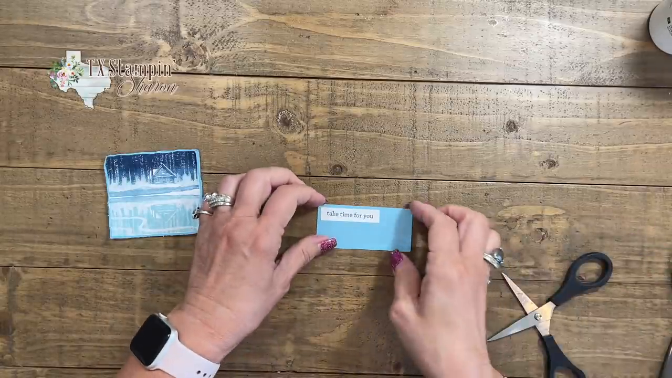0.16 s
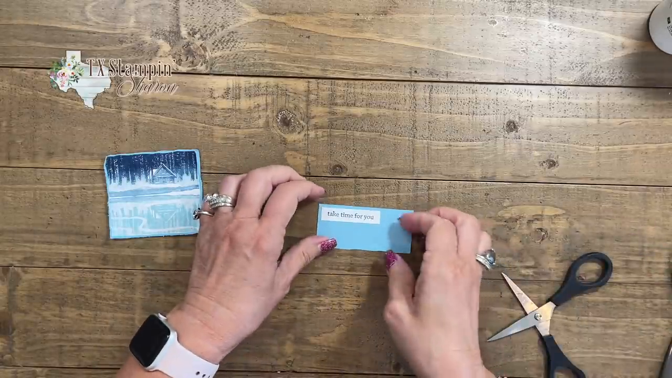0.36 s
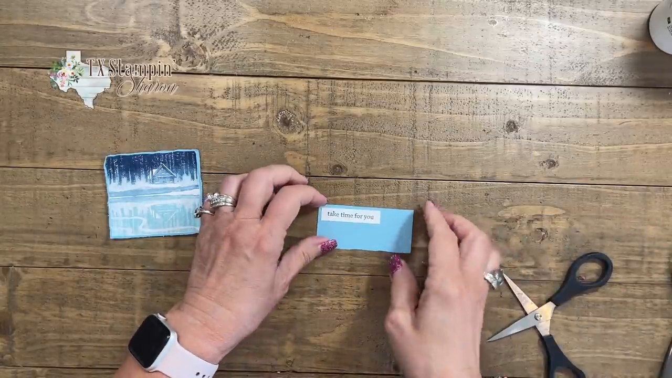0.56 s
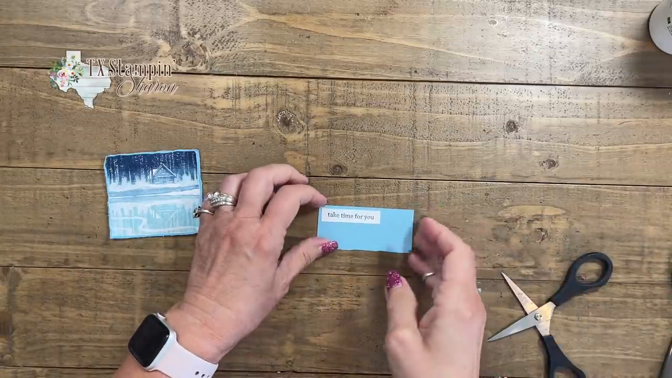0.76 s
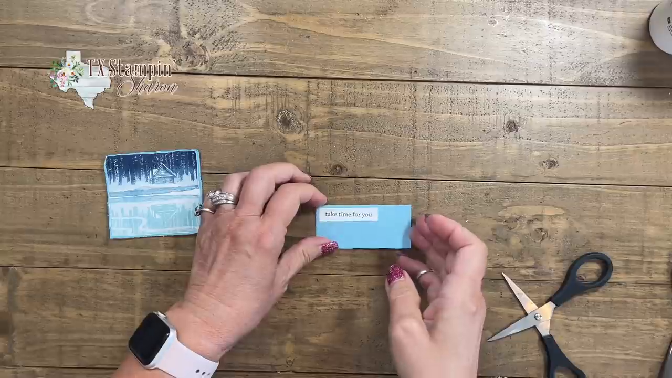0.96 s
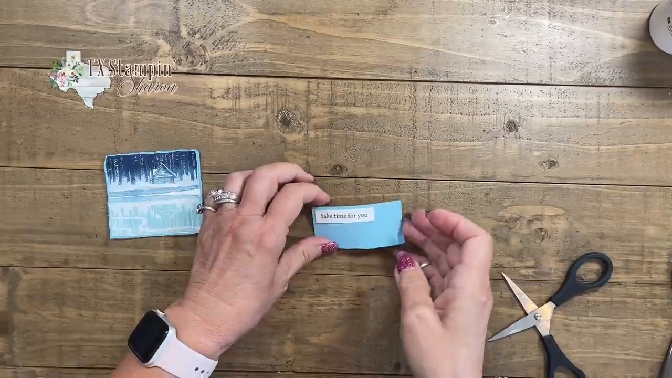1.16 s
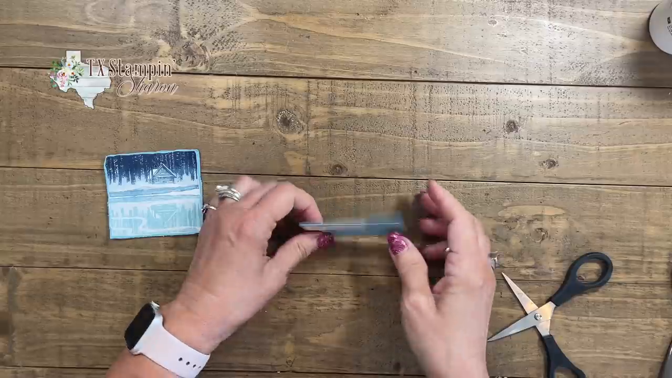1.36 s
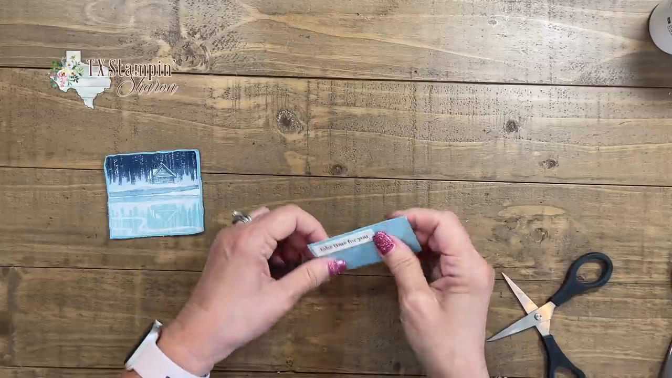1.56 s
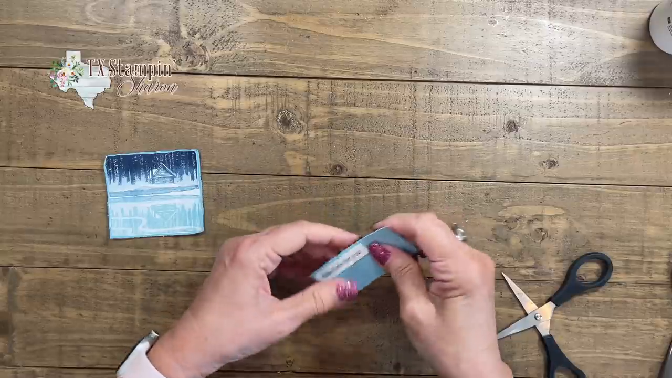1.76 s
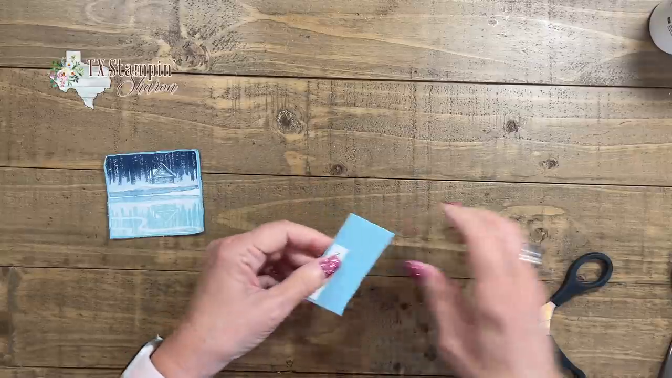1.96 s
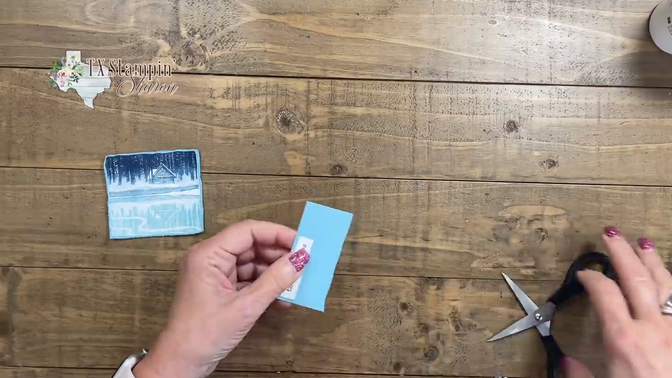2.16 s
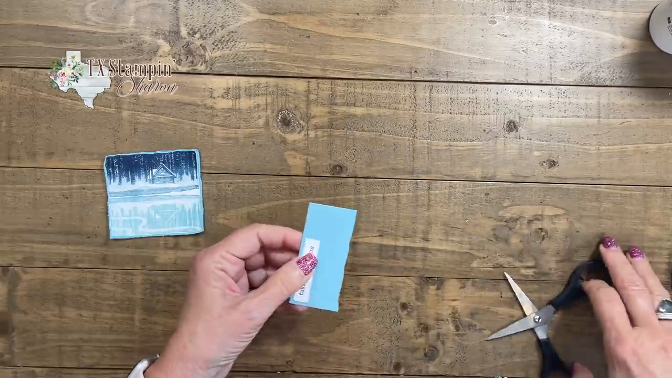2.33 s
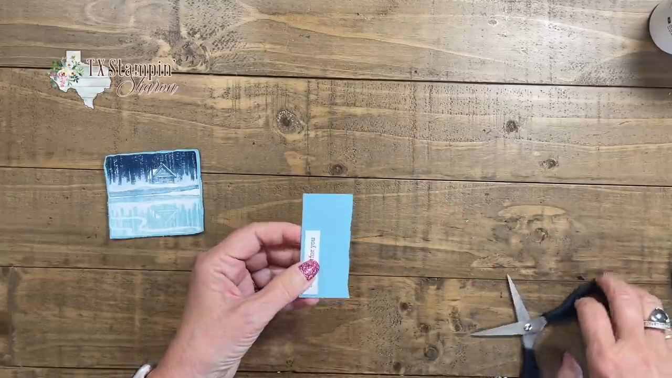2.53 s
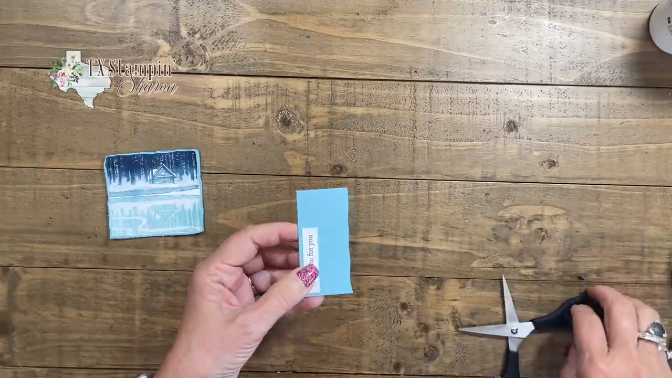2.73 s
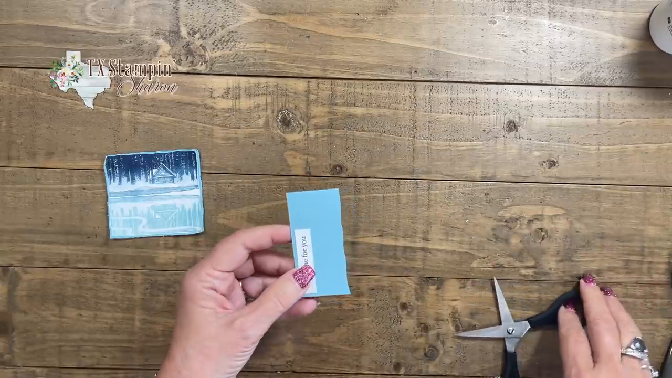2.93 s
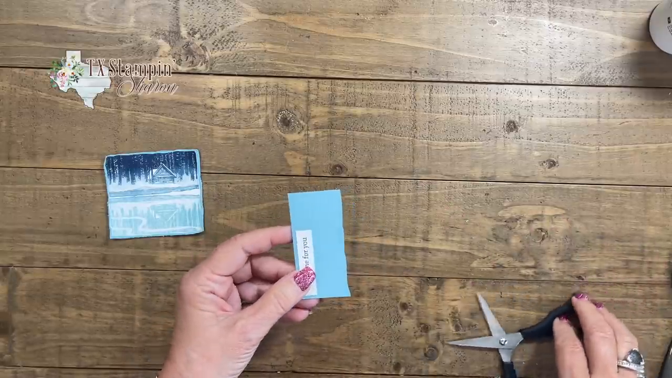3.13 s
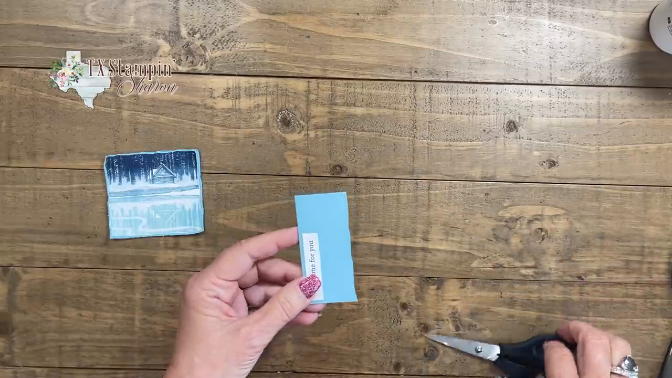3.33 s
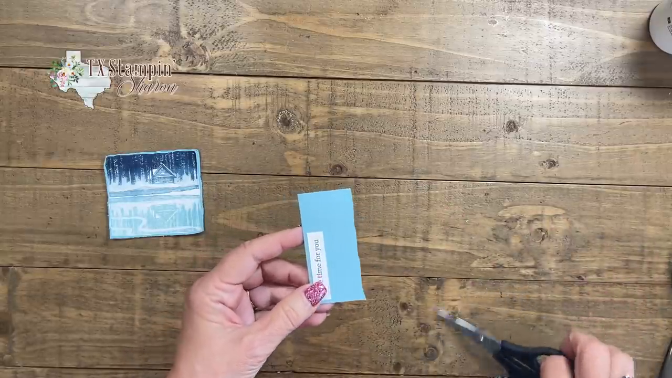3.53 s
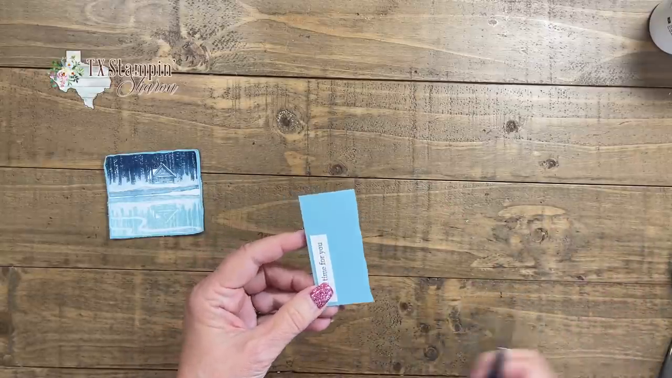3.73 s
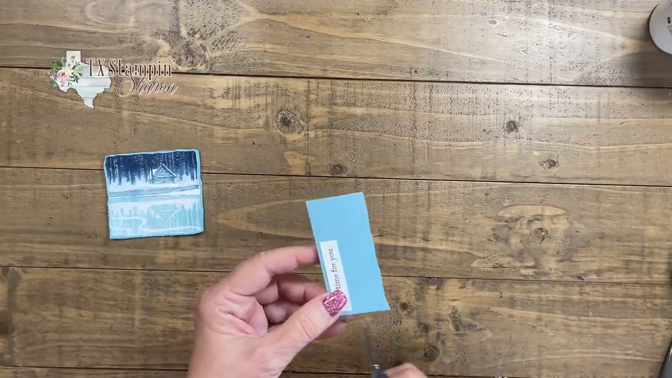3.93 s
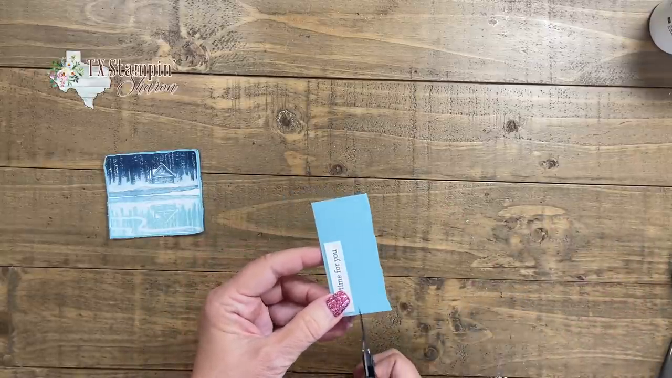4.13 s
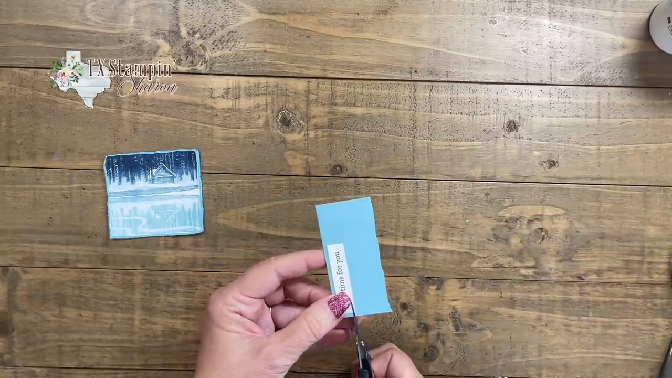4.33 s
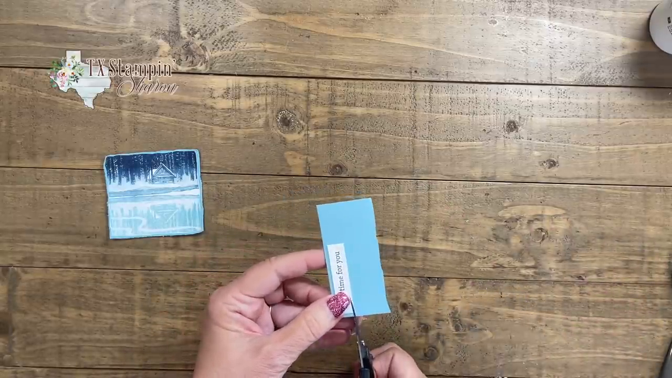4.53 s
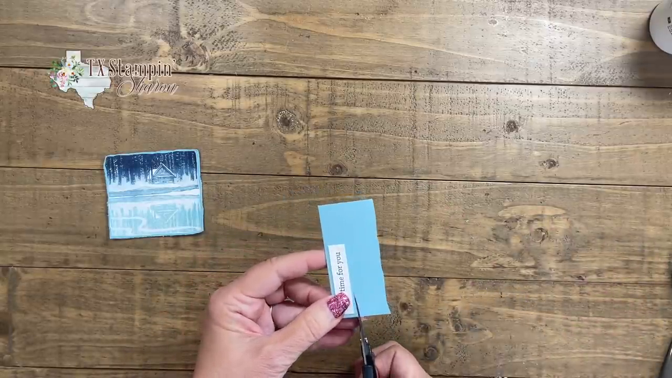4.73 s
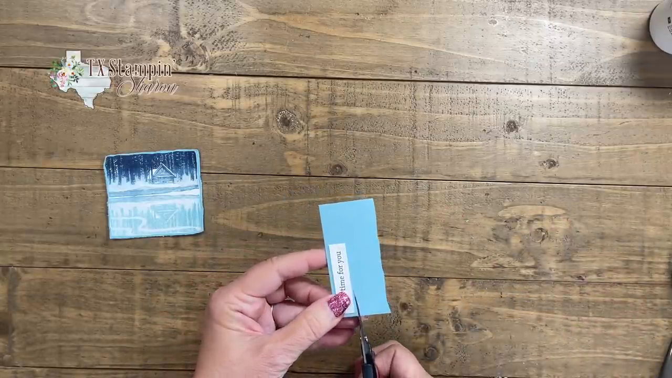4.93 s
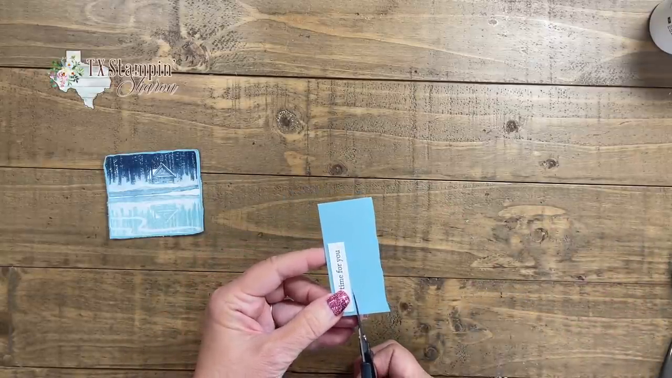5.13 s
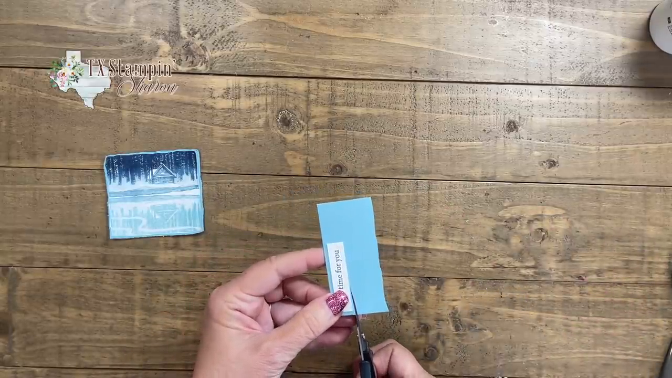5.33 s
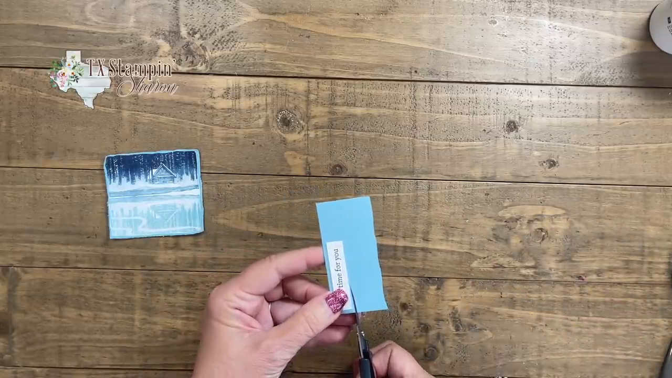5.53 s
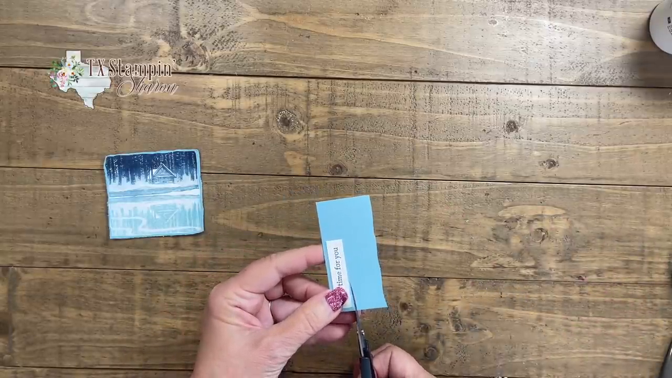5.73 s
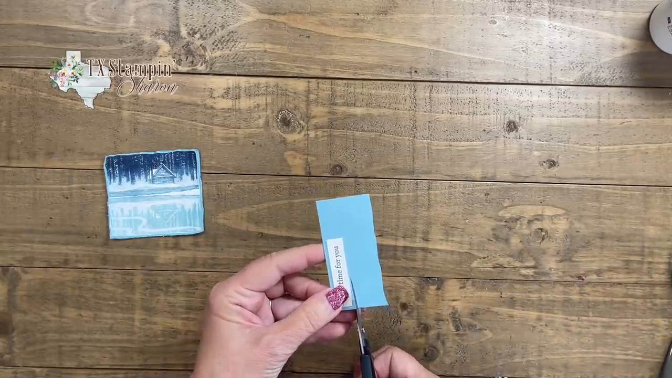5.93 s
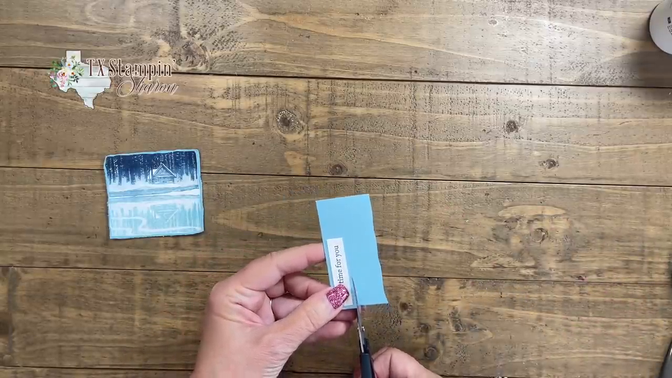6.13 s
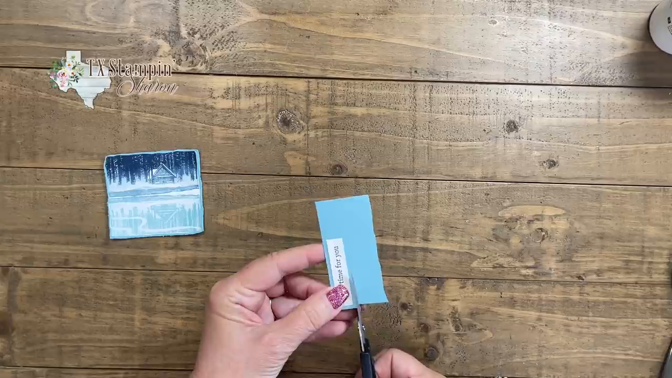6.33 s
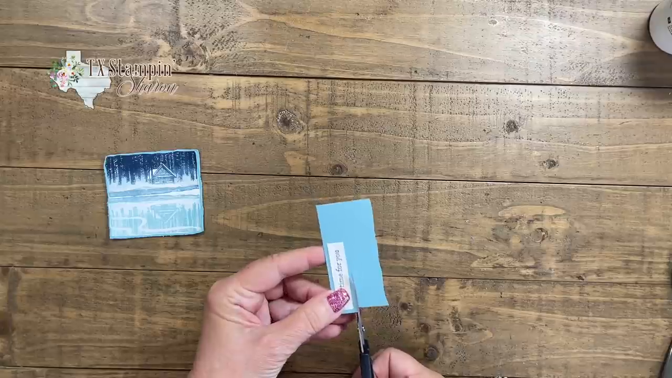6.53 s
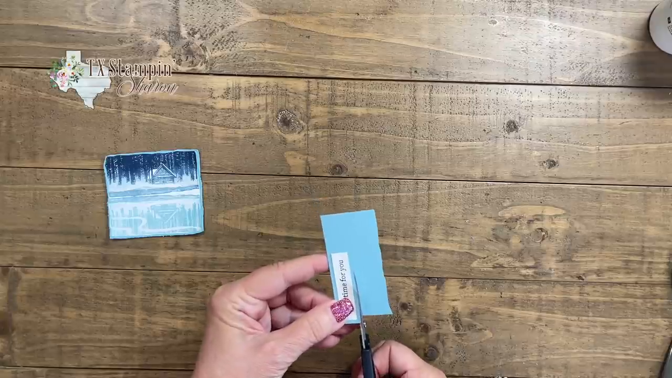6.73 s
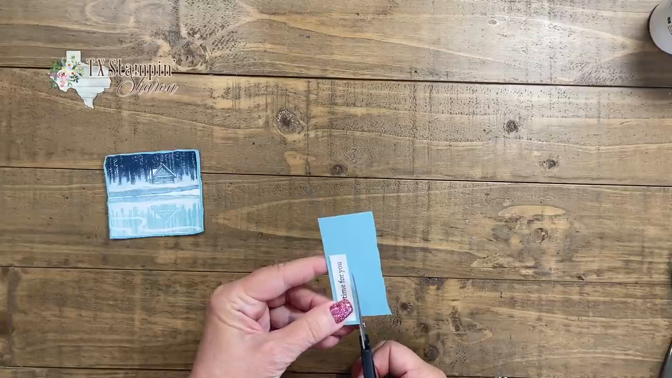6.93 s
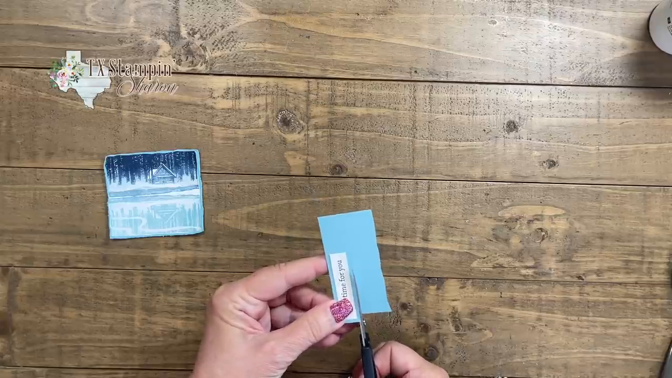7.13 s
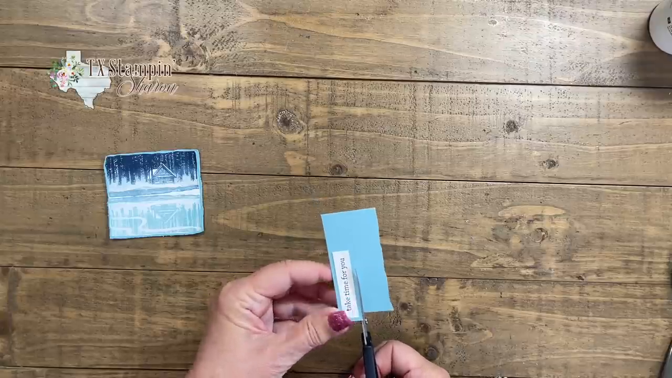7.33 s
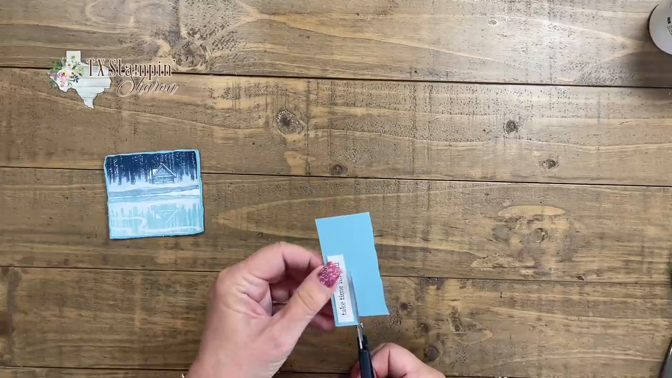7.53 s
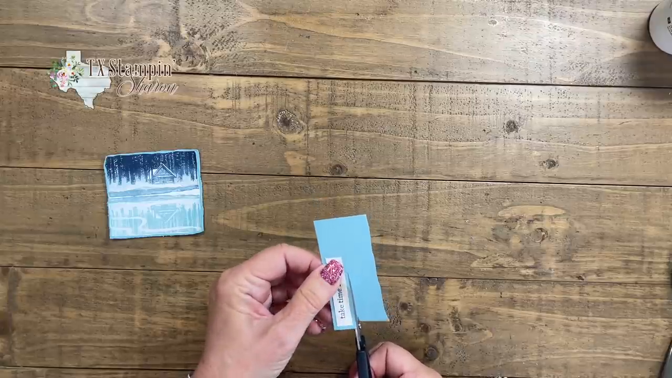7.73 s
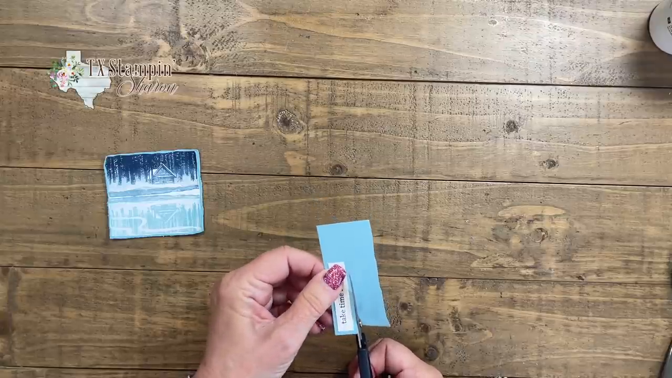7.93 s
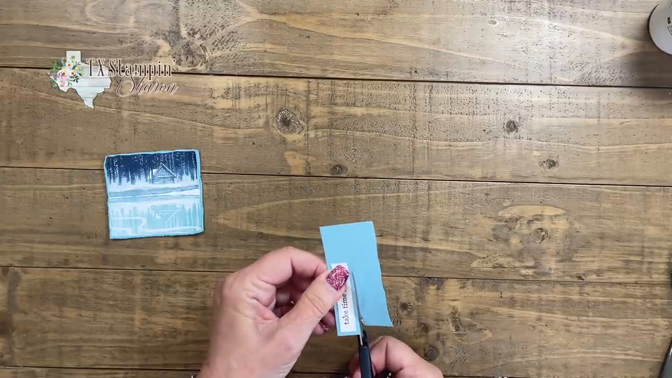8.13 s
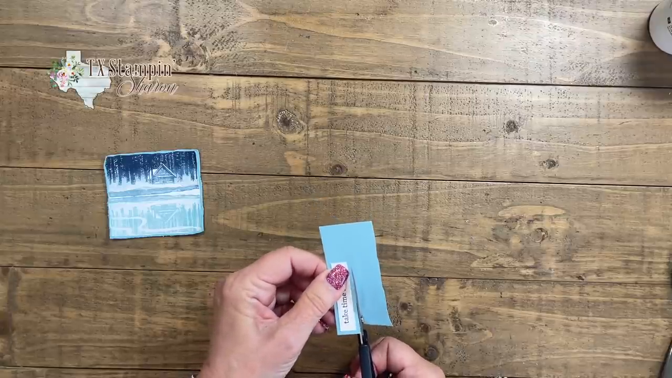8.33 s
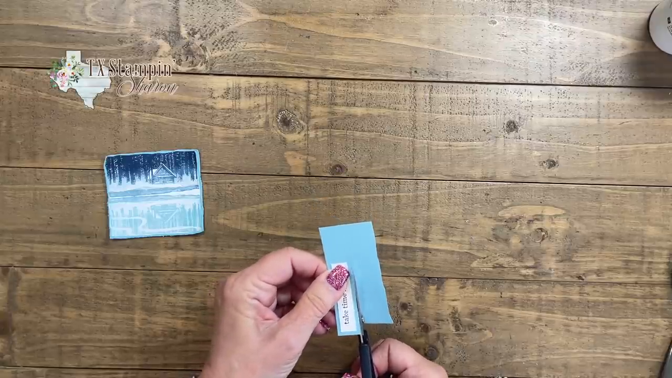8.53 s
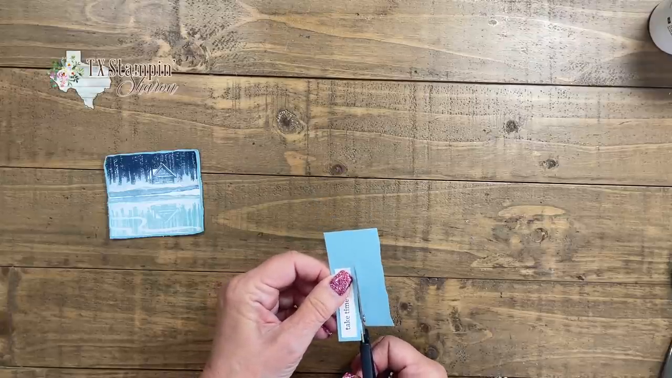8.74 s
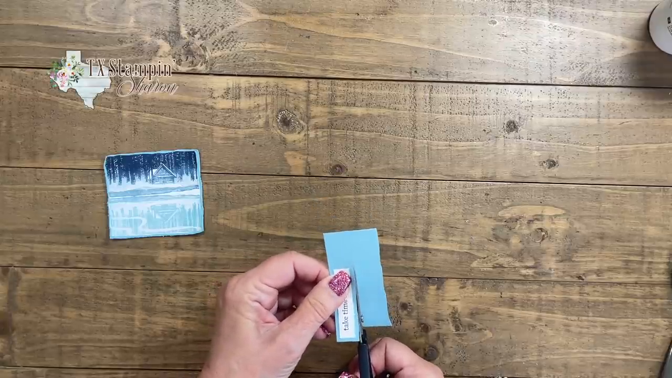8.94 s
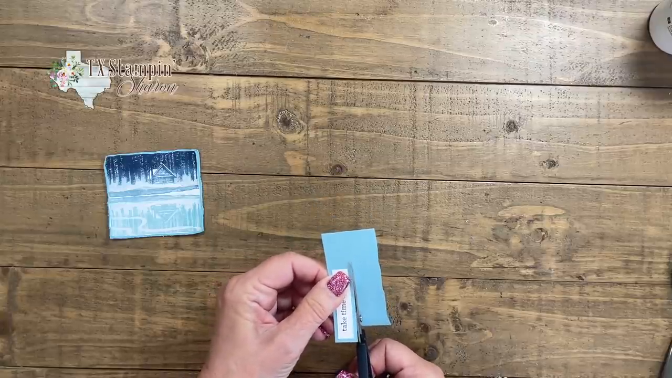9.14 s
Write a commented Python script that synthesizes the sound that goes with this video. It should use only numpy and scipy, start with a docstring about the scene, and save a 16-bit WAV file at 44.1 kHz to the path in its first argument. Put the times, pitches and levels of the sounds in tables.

```python
"""At a wooden table in a small, quiet room with a low rumble, heard close up by two spaced microphone ports.
A strip of cardstock slides off the table: its friction is a stream of tiny slips, its flicks short volleys.
Small scissors are dragged over the boards and picked up; judder and low thumps ring a set of low modes.
Then the card is trimmed in short strokes: fibres tear between the blades, stiff spots give way with a snap."""
import sys
import numpy as np
from scipy import signal
from scipy.fft import rfft, irfft
from scipy.io import wavfile
from scipy.ndimage import uniform_filter1d

SR = 44100
rng = np.random.default_rng(int(sys.argv[2]) if len(sys.argv) > 2 else 0)


def wrap_up_sound(samples):
    """Save the sound to the file named by the first command line argument, as 16-bit audio."""
    columns = np.atleast_2d(samples).T
    # keep every value between -1 and 1, then stretch to whole-number steps
    tamed = np.clip(columns, -1, 1)
    steps = np.round(tamed * 32767).astype(np.int16)
    wavfile.write(sys.argv[1], SR, steps)


N = 409248

# registers of paper and scissor sounds: (low edge [Hz], high edge [Hz])
BODY, MIDDLE, EDGE = (500, 2000), (2000, 8000), (8000, 14000)
EVENT_WINDOW_S = 0.01   # the level of a volley is its rms over this time


def from_db(db):
    """Decibels to gain."""
    return 10 ** (np.asarray(db) / 20)


def unit_energy(x):
    """Scaled so that the squares sum to 1."""
    return x / np.sqrt(np.sum(x ** 2) + 1e-20)


def at_hz(rows, hz, axis=1):
    """A column of a frequency table, joined by lines on a log frequency axis."""
    rows = np.array(rows)
    return np.interp(np.log(np.maximum(hz, 1)), np.log(rows[:, 0]), rows[:, axis])


def drift(rate):
    """Slow random wandering about 0 with a spread near 1, through `rate` points per second."""
    points = rng.standard_normal(int(N / SR * rate) + 2)
    return np.interp(np.arange(N) / SR * rate, np.arange(len(points)), points)


def signs(count):
    """Random pushes and pulls."""
    return rng.choice([-1., 1.], count)


def through(x, response):
    """Every sample of x sets the response ringing."""
    return signal.oaconvolve(x, response)[:N]


def decay(t, t60):
    """Exponential fall by 60 dB in t60 seconds."""
    return np.exp(-np.log(1000) * t / t60)


def click_response(colour, band, size=1024):
    """Causal (minimum-phase) ring of an object within one register; energy 1."""
    hz = np.fft.rfftfreq(size, 1 / SR) + 1
    low, high = band
    gain = from_db(at_hz(colour, hz)) / np.sqrt((1 + (low / hz) ** 10) * (1 + (hz / high) ** 20))
    # folding the cepstrum forward in time gives minimum phase
    cepstrum = irfft(np.log(gain + 1e-5))
    cepstrum[1:size // 2] *= 2
    cepstrum[size // 2 + 1:] = 0
    return unit_energy(irfft(np.exp(rfft(cepstrum))))


def grains(per_s, spread_db, clump_db, clump_rate):
    """Tiny slips of uneven size that come in clumps; rms about 1."""
    born = rng.random(N) < per_s / SR
    sizes = born * from_db(spread_db * rng.standard_normal(N) + clump_db * drift(clump_rate))
    return sizes / np.sqrt(uniform_filter1d(sizes ** 2, size=SR // 20) + 1e-9)


def strokes(starts, lengths, final_db, swell_db, attack_s, fall_db_per_s):
    """Gain of hand strokes: each sets in, moves evenly in dB to its final level and dies away."""
    power = np.zeros(N + 2 * SR)
    t = np.arange(SR) / SR
    for s, length, level, swell in np.broadcast(starts, lengths, final_db, swell_db):
        before_end = swell * np.maximum(1 - t / length, 0)
        after_end = fall_db_per_s * np.maximum(t - length, 0)
        gain = np.minimum(t / attack_s, 1) * from_db(level - before_end - after_end)
        start = max(int(s * SR), 0)
        power[start:start + SR] += gain ** 2
    return np.sqrt(power[:N])


def friction(slips, colour, gains, bands=(BODY, MIDDLE, EDGE)):
    """Slips ring an object in several registers, each with its own gain in time."""
    return sum(through(slips * signs(N) * gain, click_response(colour, band))
               for gain, band in zip(gains, bands))


def bursts(rows, colour, per_s, spread_db):
    """Each event is a short volley of micro-cracks that swells and dies, ringing in three registers."""
    clicks = np.zeros((3, N + SR))
    t = np.arange(1, SR // 20) / SR
    for s, level_db, body_db, edge_db, length in rows:
        age = t / max(length, 1 / SR)
        cracks = (rng.random(len(t)) < per_s / SR) * from_db(spread_db * rng.standard_normal(len(t)))
        swell = age * np.exp(-2 * age) * np.sqrt(age)
        volley = unit_energy(cracks * swell) * np.sqrt(EVENT_WINDOW_S * SR)
        start = max(int(s * SR), 0)
        for k, relative_db in enumerate((body_db, 0, edge_db)):
            clicks[k, start:start + len(t)] += from_db(level_db + relative_db) * volley * signs(len(t))
    return sum(through(c, click_response(colour, band)) for c, band in zip(clicks, (BODY, MIDDLE, EDGE)))


def resonant(x, modes):
    """The sound plus the fixed modes that it sets ringing."""
    out = x.copy()
    for hz, width_hz, db in modes:
        r = np.exp(-np.pi * width_hz / SR)
        top = (1 - r * r) / 2
        poles = [1, -2 * r * np.cos(2 * np.pi * hz / SR), r * r]
        out += from_db(db) * signal.lfilter([top, 0, -top], poles, x + 1e-18)
    return out


def moving_mode(x, pitch, width_hz):
    """Ring of one mode of changing pitch: x is turned down to 0 Hz, smoothed and turned back up."""
    r = np.exp(-np.pi * width_hz / SR)
    turn = np.exp(2j * np.pi * np.cumsum(pitch) / SR)
    return 2 * np.real(turn * signal.lfilter([1 - r], [1, -r], (x + 1e-18) / turn))


def sliding_mode(x, starts, hz, width_hz, wander_octaves):
    """A ring that takes each event's pitch and wavers about it."""
    latest = np.maximum(np.searchsorted(starts * SR, np.arange(N)) - 1, 0)
    return moving_mode(x, hz[latest] * 2 ** (wander_octaves * drift(22)), width_hz)


def shifting(x, modes, wander_octaves, rate):
    """The sound plus modes whose pitch wanders at random."""
    out = x.copy()
    for hz, width_hz, db in modes:
        out += from_db(db) * moving_mode(x, hz * 2 ** (wander_octaves * drift(rate)), width_hz)
    return out


# background of the room, shape only: (frequency [Hz], relative level [dB])
ROOM_COLOUR = [(15, -38), (25, -20), (80, -1), (180, -13), (228, -21.5), (348, -15), (620, -23), (727, -24),
               (2250, -36.5), (3260, -48.5), (4020, -51.5), (13500, -58)]


def ambience(level_db):
    """Steady low rumble of the room with a faint hiss on top: noise given the room's spectrum."""
    colour = from_db(at_hz(ROOM_COLOUR, np.fft.rfftfreq(N, 1 / SR)))
    noise = irfft(rfft(rng.standard_normal(N)) * colour, N)
    return from_db(level_db) * noise / noise.std()


# modes of the table top, ringing freely: (frequency [Hz], relative level [dB], t60 [s])
TABLE_MODES = [(73.6, -7.5, 0.24), (146, -5.5, 0.32), (192.8, -4, .28), (234, -6.5, 0.13),
               (293, -3.5, 0.13), (387.2, -2, 0.092), (464.6, -4.5, 0.062), (510, -12, 0.058),
               (559, -13.5, 0.15), (614, -11.5, 0.07), (700, -11, 0.043), (1114, -17.5, 0.021)]


def table_rings(ring_share, tilt_db):
    """The boards' modes, one ringing sine each; a harder contact favours the high ones."""
    hz, db, t60 = np.transpose(TABLE_MODES)[:, :, None]
    t = np.arange(SR // 2) / SR
    level = from_db(db + tilt_db * np.log2(hz / hz[0]))
    return level * np.sin(2 * np.pi * hz * t) * decay(t, t60 * ring_share)


def contact_rings(ring_share, tilt_db, count):
    """The boards' answer at several points of contact, each with its own mode signs; energy 1 in all."""
    return unit_energy(signs((count, len(TABLE_MODES))) @ table_rings(ring_share, tilt_db))


# hand and scissors pushed over the boards: (start [s], length [s], final table rumble [dB],
# final scrape [dB], swell [dB], ring of the handle [Hz])
DRAGS = [(0.0, 0.14, -60.5, -74, -18, 1140), (2.277, 0.14, -44.5, -67, -10, 2350),
         (2.387, 0.16, -44, -52.5, 10, 2640), (2.518, 0.018, -34, -52.5, -8, 6100),
         (2.715, 0.12, -46.5, -71.5, -3.5, 2160), (2.902, 0.32, -44, -62, 3.5, 1610),
         (3.152, 0.11, -36.5, -58.5, -2.5, 2100), (3.282, 0.073, -43.5, -66.5, -1, 1900),
         (3.428, 0.075, -52, -64, -8, 5660)]
DRAG_ATTACK_S, RUMBLE_FALL_DB_PER_S, SCRAPE_FALL_DB_PER_S = 0.0084, 160, 285


def table_rumble():
    """Things juddering over the grain ring the boards at a few points of contact."""
    s, length, rumble_db, _, swell_db, _ = np.transpose(DRAGS)
    push = strokes(s, length, rumble_db, swell_db, DRAG_ATTACK_S, RUMBLE_FALL_DB_PER_S)
    judder = grains(per_s=700, spread_db=2.5, clump_db=5.0, clump_rate=53) * push
    rings = contact_rings(ring_share=0.76, tilt_db=1.2, count=4)
    return sum(through(judder * signs(N), ring) for ring in rings)


# colour of the scissors on wood: (frequency [Hz], relative level [dB])
SCISSORS_COLOUR = [(400, -1), (800, -9), (1400, -13), (2100, -16), (3000, -17.5), (3600, -19),
                   (4500, -13.5), (5400, -22), (8000, -26), (11000, -21.5), (12000, -36), (13500, -63)]
# resonances of the steel blades: (frequency [Hz], width [Hz], level [dB])
BLADE_MODES = [(2093, 45, 3.5), (2910, 140, 0.5), (4030, 360, -11.5), (5780, 270, -1)]


def scissors_scrape():
    """Plastic handles scrape on the wood in fine slips that ring the handle and the blades."""
    s, length, _, scrape_db, swell_db, hz = np.transpose(DRAGS)
    push = strokes(s, length, scrape_db, swell_db, DRAG_ATTACK_S, SCRAPE_FALL_DB_PER_S)
    slips = grains(per_s=2000, spread_db=2.0, clump_db=1.0, clump_rate=70)
    scrape = friction(slips, SCISSORS_COLOUR, [push * from_db(db) for db in (3.5, -2.5, -3.0)])
    handle = sliding_mode(scrape, s, hz, width_hz=130, wander_octaves=0.14)
    return resonant(scrape + from_db(4.5) * handle, BLADE_MODES)


# low thumps, blows on the table and, at 8.437, a thump of the hand-held card: (time [s],
# peak before the bass cut [dB], share of the modes' free ring time [ratio], brightness [dB per octave])
THUMPS = [(.02, -28.5, 1.13, -9), (0.774, -35.5, 1.05, 5), (1.283, -27, 0.46, 4), (2.268, -28, 1.5, -1),
          (2.333, -25, 0.47, 3), (2.553, -25.5, 1.2, 5), (2.885, -23.5, 0.78, 0.5),
          (2.958, -26.5, 1.4, -1.5), (8.437, -41.5, 1.6, -1)]


def thumps(uneven_db):
    """Single thumps, all made from the table's modes; each gives every mode its own strength and sign."""
    out = np.zeros(N + SR)
    modes = len(TABLE_MODES)
    for s, peak_db, ring_share, tilt_db in THUMPS:
        mix = from_db(uneven_db * rng.standard_normal(modes)) * signs(modes)
        ring = mix @ table_rings(ring_share, tilt_db)
        start = max(int(s * SR), 0)
        out[start:start + len(ring)] += from_db(peak_db) * ring / np.abs(ring).max()
    return out[:N]


def rumble_and_thumps():
    """The low sounds together, cut in the bass as a board radiates little below its lowest mode."""
    bass_cut = signal.butter(4, 54, "high", fs=SR, output="sos")
    return signal.sosfilt(bass_cut, table_rumble() + thumps(uneven_db=3.0))


# colour of the loose card: (frequency [Hz], relative level [dB])
LOOSE_CARD_COLOUR = [(300, -28.5), (1100, 3.5), (1900, -6), (2700, -10), (3800, -13.5), (5300, -10),
                     (7500, -15), (9500, -17.5), (11000, -11.5), (12000, -22.5), (13500, -44.5)]
# broad resonances of the loose card: (frequency [Hz], width [Hz], level [dB])
LOOSE_CARD_MODES = [(2660, 450, 1), (3850, 760, 7)]
# the card slides over wood and fingers: (start [s], length [s], final level [dB], swell [dB],
# body [dB re level], edge [dB re level], swish [dB re level])
SLIDES = [(0.243, 0.01, -65.5, -3, 6.5, 12, -19), (0.381, 0.045, -74.5, -2.5, 10.5, 0, -19),
          (0.945, 0.095, -56.5, 21.5, -9, 2, 3.5), (1.106, 0.097, -58.5, 17.5, -2.5, 2.5, 4),
          (1.237, 0.13, -62, 12, 4.5, 9.5, -3.5), (1.505, 0.14, -75.5, -3.5, 2, 8, -13),
          (1.787, 0.081, -63, 6, 4, 5, -23)]
SLIDE_ATTACK_S, SLIDE_FALL_DB_PER_S = 0.02, 426.5
SWISH = (2530, 4560)   # register of the card's edge sweeping the grain: (low [Hz], high [Hz])
# the card's edge flicks off nails and table: (time [s], level [dB], body [dB re level],
# edge [dB re level], length [s])
FLICKS = [(0.7732, -76, 18.5, 14.5, 0.0024), (1.276, -46, -21, 1, 0.00072),
          (1.2793, -37.5, -24, -3.5, 0.0019), (1.3645, -50, -9, 7.5, 0.00088), (1.543, -65, 1, 8, 0.0012),
          (1.805, -63.5, 0, -12, 0.0023)]


def loose_card():
    """The card hisses and swishes over the wood in dense tiny slips, and its edge flicks."""
    s, length, level_db, swell_db, body_db, edge_db, swish_db = np.transpose(SLIDES)
    gains = [strokes(s, length, level_db + db, swell_db, SLIDE_ATTACK_S, SLIDE_FALL_DB_PER_S)
             for db in (body_db, 0, edge_db, swish_db)]
    rub = grains(per_s=10000, spread_db=0.0, clump_db=8.5, clump_rate=36)
    hiss = friction(rub, LOOSE_CARD_COLOUR, gains, bands=(BODY, MIDDLE, EDGE, SWISH))
    flicks = bursts(FLICKS, LOOSE_CARD_COLOUR, per_s=11000, spread_db=2.5)
    return resonant(hiss + flicks, LOOSE_CARD_MODES)


def chatter(x, per_s, t60):
    """A dying run of uneven bounces."""
    t = np.arange(SR // 4) / SR
    bounces = (rng.random(len(t)) < per_s / SR) * signs(len(t))
    return through(x, unit_energy(bounces * decay(t, t60)))


# handles and blades clack as the scissors are handled: (time [s], level [dB], body [dB re level],
# edge [dB re level], ring of the struck part [Hz])
CLACKS = [(2.266, -46.5, 4, -17, 2450), (2.279, -50, 6.5, -27, 2900), (2.3305, -54.5, -12, 1, 3420),
          (2.387, -52, -1, -3, 2460), (2.884, -55.5, 7, -37, 1900), (2.9566, -50, 4, -10, 1930),
          (3.064, -59, -6, -13, 6040), (3.098, -61, 6.5, -1, 1750), (3.2962, -67, 6, 16.5, 2100),
          (3.332, -59, 3, 8, 2100), (3.4985, -54.5, 1, 10.5, 4020), (3.682, -61.5, -4, 12, 3800),
          (3.7033, -75, -8, 20, 3760)]
CLACK_LENGTH_S = 0.0029


def scissors_clacks():
    """Short volleys of cracks, each with its own ring; the loose blades chatter on."""
    s, *_, hz = np.transpose(CLACKS)
    rows = [(*row[:-1], CLACK_LENGTH_S) for row in CLACKS]
    clacks = bursts(rows, SCISSORS_COLOUR, per_s=7200, spread_db=1.0)
    ring = from_db(7) * sliding_mode(clacks, s, hz, width_hz=420, wander_octaves=0)
    bounces = from_db(-2.5) * chatter(ring, per_s=600, t60=0.11)
    return resonant(clacks + ring + bounces, BLADE_MODES)


CUT_ATTACK_S, CUT_FALL_DB_PER_S = 0.0087, 627   # shared by the blade rubs and the cutting strokes
# the blades rub as they part, swelling to a stop: (start [s], length [s], final level [dB])
BLADE_RUBS = [(3.908, 0.013, -74), (4.47, 0.042, -88), (4.544, 0.02, -71), (5.148, .01, -89)]
RUB_BODY_DB, RUB_EDGE_DB = -5, -0.5   # relative to level
# ring of the open blades: (frequency [Hz], width [Hz], level [dB])
OPEN_BLADE_MODES = [(2310, 55, 21.5), (4000, 120, 15), (5900, 160, 14)]


def blade_ticks():
    """Light rubs of steel on steel, swelling noise, ring the open blades."""
    s, length, level_db = np.transpose(BLADE_RUBS)
    gains = [strokes(s, length, level_db + db, 10.4, CUT_ATTACK_S, CUT_FALL_DB_PER_S)
             for db in (RUB_BODY_DB, 0, RUB_EDGE_DB)]
    return resonant(friction(rng.standard_normal(N), SCISSORS_COLOUR, gains), OPEN_BLADE_MODES)


# slow squeezes, in which the blades bite forward in small slips: (start [s], length [s],
# final slip level before its random spread [dB], swell [dB], edge [dB re level])
BITES = [(5.618, 0.61, -62.5, 23, 5.5), (6.901, 0.37, -70.5, -4.5, 4), (8.238, 0.222, -59, 13, 0),
         (8.875, 0.19, -70, -6, 5.5)]
SLIPS_PER_S, SLIP_JITTER, SLIP_SPREAD_DB = 75, 0.8, 3   # jitter is a share of the gap between slips
# colour is the spread of the body from slip to slip
SLIP_LENGTH_S, SLIP_BODY_DB, SLIP_COLOUR_DB = 0.0054, -5.5, 4.5


def bite_slips():
    """Stick and slip: a squeeze advances in small, uneven snaps that follow its force."""
    rows = []
    for start, length, final_db, swell_db, edge_db in BITES:
        ages = np.arange(0, length, 1 / SLIPS_PER_S)
        for age, (late, louder, fuller) in zip(ages, rng.standard_normal(size=(100, 3))):
            s = start + age + SLIP_JITTER * late / SLIPS_PER_S
            level_db = final_db - swell_db * (1 - age / length) + SLIP_SPREAD_DB * louder
            body_db = SLIP_BODY_DB + SLIP_COLOUR_DB * fuller
            rows.append((s, level_db, body_db, edge_db, SLIP_LENGTH_S))
    return rows


# colour of the card held in the blades: (frequency [Hz], relative level [dB])
HELD_CARD_COLOUR = [(300, 6.5), (700, -6.5), (1150, -1.5), (1950, -9.5), (2800, 2.5), (3300, -2),
                    (3750, -8.5), (4300, 2), (5400, -8.5), (6500, -7.5), (9000, -17), (10800, -8),
                    (12000, -24), (13500, -56)]
# flexing modes of the held card, before they wander: (frequency [Hz], width [Hz], level [dB])
FLEX_MODES = [(1195, 24, 11), (1564, 25, 6.5), (2780, 170, -5.5)]
# fibre bundles give way between the blades: (time [s], level [dB], body [dB re level],
# edge [dB re level], length [s])
SNAPS = [(6.1695, -62, -5, 10, 0.0019), (6.1928, -52.5, -17, 5, 0.0025), (6.2145, -67, -3, 13.5, 0.004),
         (6.3776, -48.5, -4.5, 2.5, 0.0034), (6.405, -56, -1, 2.5, 0.0027), (6.5138, -48, -5, -5, 0.0022),
         (7.0326, -54, -7, 2.5, 0.0042), (7.0556, -54.5, -9, 4, 0.0016), (7.0828, -61, -2, 11, 0.0076),
         (7.1324, -62.5, 7.5, 6, 0.0019), (7.2615, -42.5, -2.5, 0.5, 0.0031),
         (7.6234, -52, -7, -0.5, 0.0014), (7.7014, -54, 4, -3.5, 0.0023), (8.291, -56, -11, -1, 0.0058),
         (8.3541, -57, -1, -1, 0.0038), (8.4237, -55, 4, 6.5, 0.0038), (8.4375, -61, 14, -11, 0.0056),
         (8.4713, -54.5, 6, 5.5, 0.0032), (8.868, -54.5, -3.5, 4, 0.0028), (8.8985, -50, -2.5, -0.5, 0.005),
         (8.9167, -52.5, -3.5, 3, 0.0038), (8.9841, -50.5, 0, 7, 0.0067), (9.0042, -52, -2.5, 5.5, 0.014),
         (9.042, -55, -5, 2, 0.0063), (9.2322, -54.5, -1, 2, 0.0031), (9.2661, -51.5, -4, -4, 0.0054)]
# quick strokes, in which the blades run freely and slow down: (start [s], length [s],
# final level [dB], sag [dB], body [dB re level], edge [dB re level], pitch of the shear [Hz])
GLIDES = [(6.516, 0.105, -57.5, 2, -6, 1.5, 2970), (6.636, 0.11, -65.5, 9, -7.5, -6.5, 2710),
          (7.555, 0.075, -71.5, 0, -3, -6, 2950), (7.706, 0.15, -61.5, 1.5, 0, -3, 2730),
          (7.916, 0.13, -61, 8, -3, -8, 2360), (8.611, 0.069, -62.5, 11, -0.5, 0, 3094)]
BITE_CRUNCH_DB = -13   # steady tearing between the slips, relative to them


def cutting():
    """Fibres tear where the blades cross; the card radiates the crackle through wandering flexing modes."""
    s, length, level_db, swell_db, edge_db = np.transpose(BITES)
    crunch_db = level_db + BITE_CRUNCH_DB
    biting = [strokes(s, length, crunch_db + db, swell_db, CUT_ATTACK_S, CUT_FALL_DB_PER_S)
              for db in (SLIP_BODY_DB, 0, edge_db)]
    s, length, level_db, sag_db, body_db, edge_db, shear_hz = np.transpose(GLIDES)
    gliding = [strokes(s, length, level_db + db, -sag_db, CUT_ATTACK_S, CUT_FALL_DB_PER_S)
               for db in (body_db, 0, edge_db)]
    tears = grains(per_s=1800, spread_db=1.0, clump_db=2.0, clump_rate=120)
    crunch = friction(tears, HELD_CARD_COLOUR, np.hypot(gliding, biting))
    shear = sliding_mode(crunch, s, shear_hz, width_hz=250, wander_octaves=0.068)
    snaps = bursts(list(SNAPS) + bite_slips(), HELD_CARD_COLOUR, per_s=3500, spread_db=3.5)
    return shifting(crunch + from_db(4) * shear + snaps, FLEX_MODES, wander_octaves=0.133, rate=13)


def room(x, t60, delay_s):
    """A diffuse tail of decaying noise that takes about delay_s to build up."""
    t = np.arange(SR // 2) / SR
    build_up = 1 - np.exp(-(t / delay_s) ** 2)
    return through(x, unit_energy(rng.standard_normal(len(t)) * decay(t, t60) * build_up))


# the two microphone ports: (frequency [Hz], phase by which left leads [rad], left over right [dB])
PORT_DIFFERENCES = [(150, 0, 0), (450, 0, 2.6), (700, -.6, 1.8), (2100, .1, .3), (2900, .7, 1),
                    (3700, .3, -.6), (4400, 1.5, -2), (4850, 3, -3.5), (5400, 5.7, .6), (6100, 6.4, 0),
                    (9300, 9.5, .2), (11700, 12.3, 0)]


def ports(common, diffuse, apart_hz):
    """The ports differ in phase and level; diffuse sound sets them apart only above the bass."""
    hz = np.fft.rfftfreq(N, 1 / SR)
    half_phase = np.exp(.5j * at_hz(PORT_DIFFERENCES, hz, axis=1))
    half = half_phase * from_db(at_hz(PORT_DIFFERENCES, hz, axis=2) / 2)
    side = signal.sosfilt(signal.butter(2, apart_hz, "high", fs=SR, output="sos"), diffuse)
    spectrum = rfft(common)
    return np.array([irfft(spectrum * half, N) + side, irfft(spectrum / half, N) - side])


def scene():
    """All sources are close to the microphone, in a small room."""
    handling = rumble_and_thumps() + scissors_scrape() + loose_card() + scissors_clacks()
    direct = handling + blade_ticks() + cutting()
    t60, delay_s = 0.36, 0.007
    common = direct + from_db(-15.5) * room(direct, t60, delay_s) + ambience(level_db=-55.5)
    diffuse = from_db(-17.5) * room(direct, t60, delay_s) + ambience(level_db=-59.0)
    return ports(common, diffuse, apart_hz=382)


CUTOFF_HZ = 13700


def record(dry):
    """The top is cut steeply by an elliptic low-pass."""
    return signal.sosfilt(signal.ellip(10, .2, 70, CUTOFF_HZ, fs=SR, output="sos"), dry)


dry = scene()
out = record(dry)
wrap_up_sound(out)
```